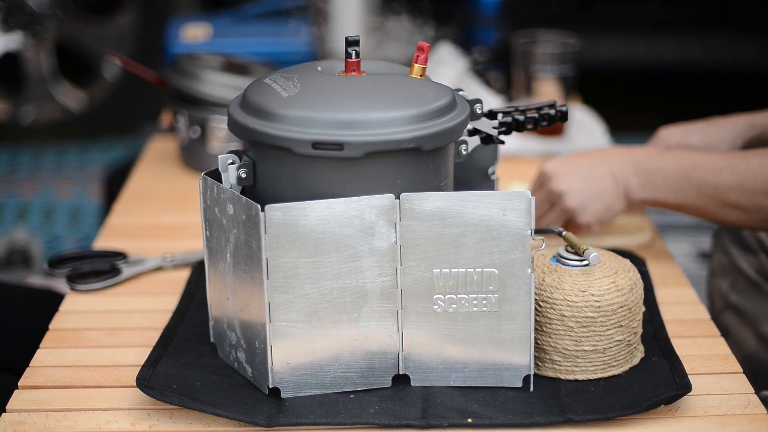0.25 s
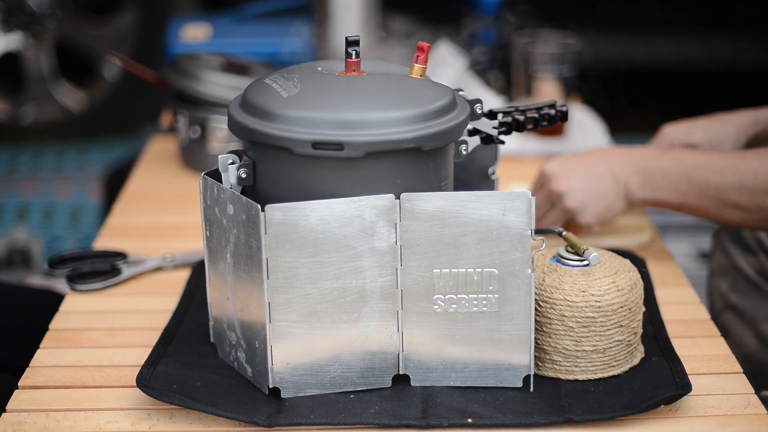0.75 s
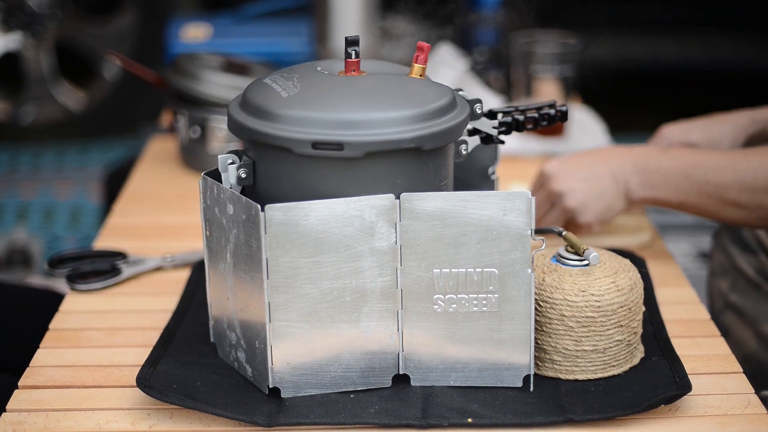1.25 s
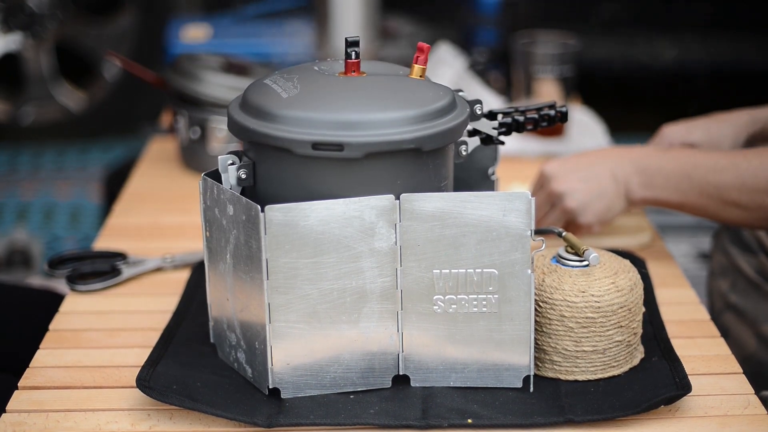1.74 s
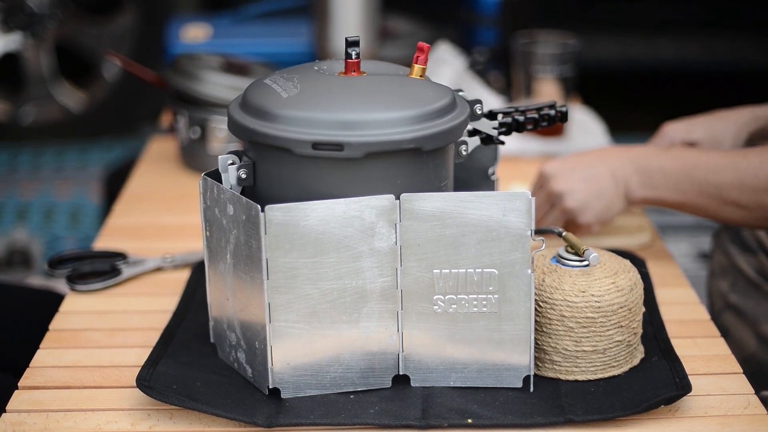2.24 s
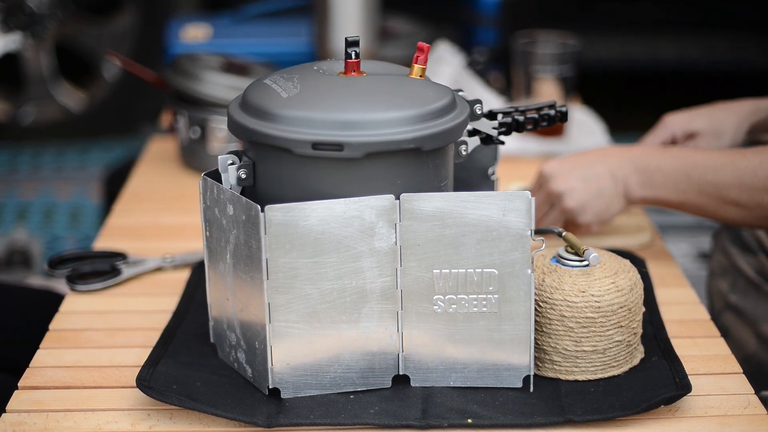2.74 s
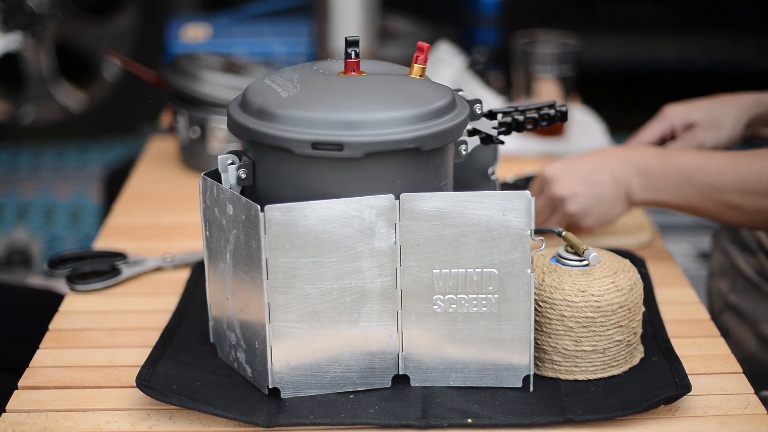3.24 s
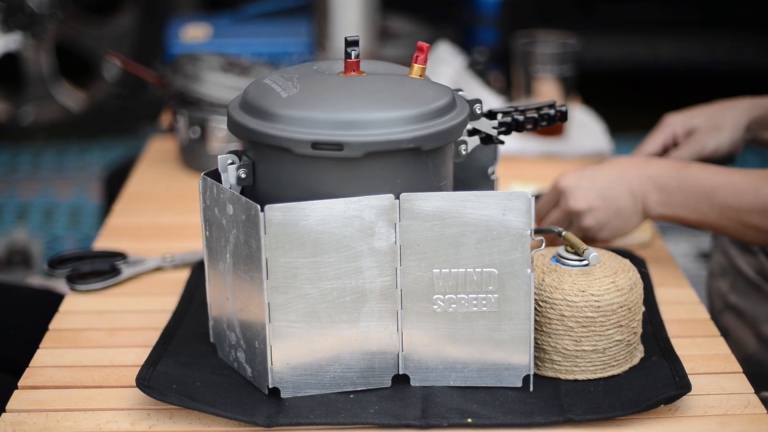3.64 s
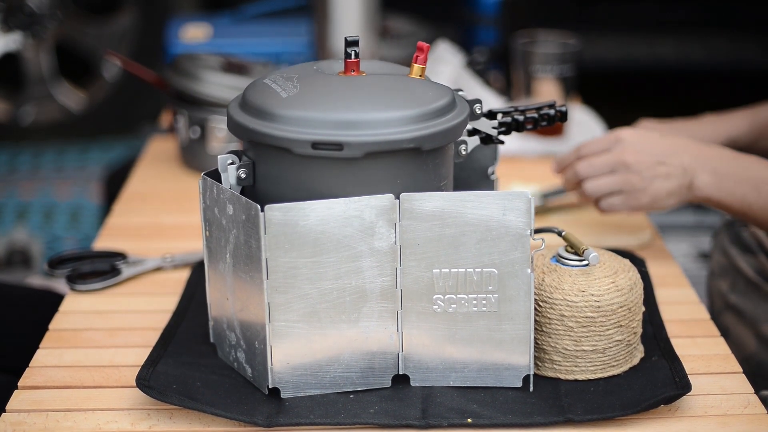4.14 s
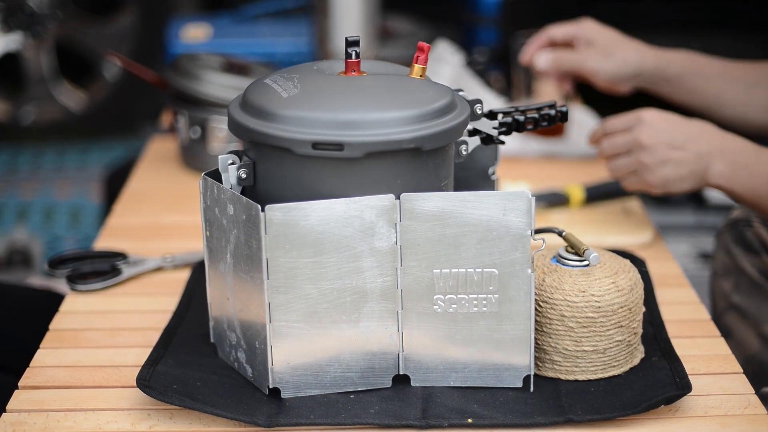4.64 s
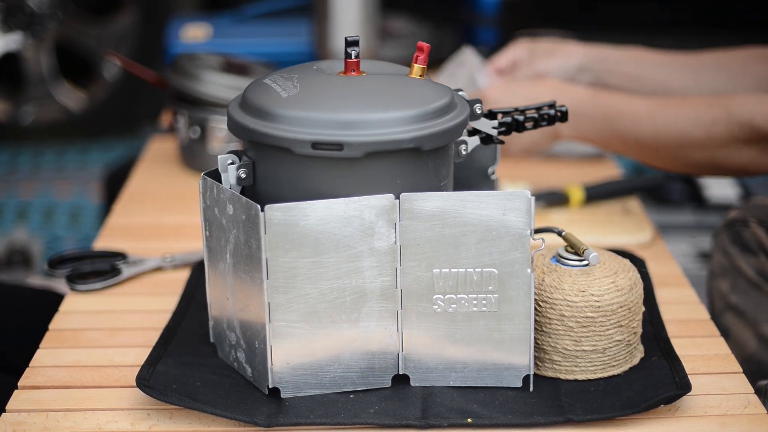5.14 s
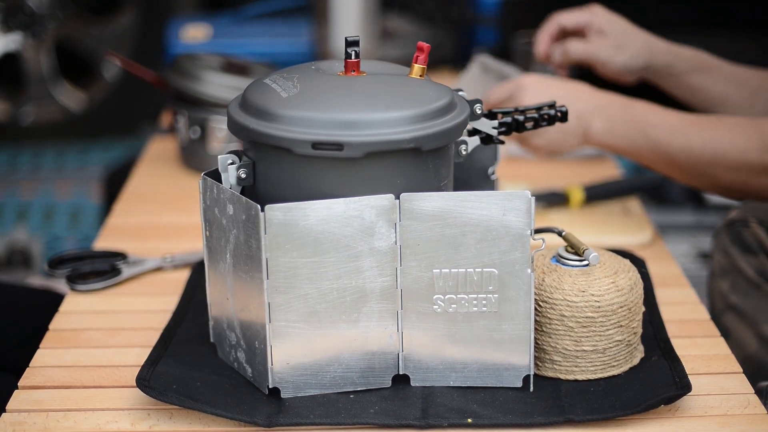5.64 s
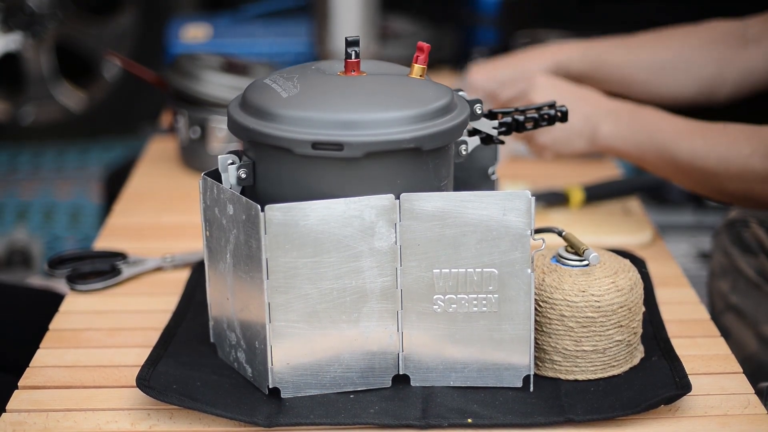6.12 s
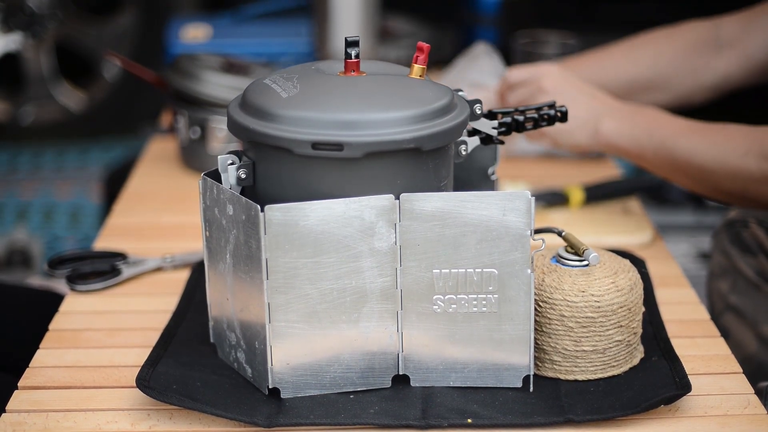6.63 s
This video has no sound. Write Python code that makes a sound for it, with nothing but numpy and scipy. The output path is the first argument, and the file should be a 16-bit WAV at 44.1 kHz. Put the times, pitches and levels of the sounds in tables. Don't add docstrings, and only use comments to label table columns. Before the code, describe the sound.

Steady thin steam hiss over a low burner roar, spaced knocks of a knife on wood, two sharp steam blasts, faint paper crinkle and wind.

```python
import sys
import numpy as np
from scipy import signal
from scipy.fft import rfft, irfft, next_fast_len
from scipy.io import wavfile
from scipy.ndimage import uniform_filter1d

SR = 44100
rng = np.random.default_rng(int(sys.argv[2]) if len(sys.argv) > 2 else 0)


def dump_mix(stems):
    frames = np.atleast_2d(stems).T
    limited = np.clip(frames, -1, 1)
    pcm = np.round(limited * 32767).astype(np.int16)
    wavfile.write(sys.argv[1], SR, pcm)


def gain_from_db(level_db):
    decades = np.asarray(level_db, float) / 20
    return 10 ** decades


N = 303408


def unit_rms(x):
    return x / np.sqrt(np.mean(x ** 2) + 1e-20)


def noise():
    return rng.standard_normal(N)


def spectrum(points, hz):
    f, value = np.transpose(points)
    return np.interp(np.log(hz + 1), np.log(f + 1), value)


def curves(rows, t):
    s, *columns = np.transpose(rows)
    return [np.interp(t, s, column) for column in columns]


def resonate(x, hz, width_hz):
    turn = np.exp(2j * np.pi * np.cumsum(hz * np.ones(len(x))) / SR)
    r = np.exp(-np.pi * width_hz / SR)
    return 2 * (turn * signal.lfilter([1 - r], [1, -r], x / turn)).real


def resonate_twice(x, hz, width_hz):
    return resonate(resonate(x, hz, width_hz), hz, width_hz)


def turbulence(colour, size, low_rows=None, base_db=0, from_hz=400, to_hz=4500,
               patchy_db=1.0, flicker_db=0.39):
    hop = size // 4
    frames, hz = N // hop + 5, np.fft.rfftfreq(size, 1 / SR)
    t = np.arange(frames) * hop / SR
    a, b, patches = rng.standard_normal((frames, len(hz), 3)).T
    patches = uniform_filter1d(patches, size=5, axis=0)
    patches = unit_rms(uniform_filter1d(patches, size=16, axis=1))
    flicker = unit_rms(uniform_filter1d(rng.standard_normal(frames), size=12))
    db = spectrum(colour, hz)[:, None] + patchy_db * patches + flicker_db * flicker
    if low_rows is not None:
        below = 1 / (1 + (hz[:, None] / to_hz) ** 4)
        above = 1 / (1 + (from_hz / (hz[:, None] + 1)) ** 4)
        db = db + (curves(low_rows, t)[1] - base_db) * below * above
    z = (a + 1j * b) * gain_from_db(db)
    return unit_rms(signal.istft(z, nperseg=size, noverlap=size - hop)[1][:N])


# t/s, level/dB, low hiss/dB
LEAK_CURVE = [(0, -42.5, -11), (.25, -42.5, -9), (.55, -41, -6), (.75, -42.5, -9), (.95, -42, -8.5),
              (1.4, -44.5, -10.5), (1.6, -47, -8), (2.3, -48.5, -8), (2.7, -45.5, -13.5),
              (3.2, -47.5, -12.5), (3.7, -45.5, -12), (4.5, -46, -14), (5.22, -44.5, -12.5),
              (5.4, -46.5, -4), (5.7, -47.5, -8), (6.35, -45.5, -7), (6.55, -46.5, -8.5), (6.88, -45, -9)]
# f/Hz, density/dB
LEAK_COLOUR = [(300, -30), (900, -18.5), (1500, -17), (2500, -6.5), (4000, -5), (6000, -0.66), (8500, -1),
               (9700, -5), (10700, -7), (11800, -10.5), (13000, -14), (15500, -19)]


def leak(t):
    jet = turbulence(LEAK_COLOUR, size=512, low_rows=LEAK_CURVE, base_db=-3.5, from_hz=1400, to_hz=4330)
    return gain_from_db(curves(LEAK_CURVE, t)[0] + 6.5) * jet


def lift(up_s, opening_s, down_s, db, linger_s):
    roar_open_db, roar_mid_db, roar_end_db, roar_after_db = -11.5, -5, -14, -3.5
    swell_db, drop_s, seat_s = 1, 0.006, 0.026
    mid_s = up_s + 0.33 * (down_s - up_s)
    return [(up_s, db - 30, roar_open_db),
            (up_s + opening_s, db - swell_db, roar_open_db),
            (mid_s, db - 0.8, roar_mid_db),
            (down_s, db + swell_db, roar_end_db),
            (down_s + drop_s, db - 10.5, roar_end_db),
            (down_s + seat_s, db - 24.5, roar_after_db),
            (down_s + seat_s + linger_s, db - 25, roar_after_db)]


# lift t/s, opening/s, drop t/s, level/dB, linger/s
BLOW_OFFS = [
    (1.398, 0.021, 1.5575, -28.5, 0.07),
    (5.236, 0.012, 5.349, -28, 0.092),
]
# f/Hz, density/dB
BLOW_COLOUR = [(200, -23.5), (400, -22), (700, -18), (1500, -8.5), (2500, -9), (4000, -5), (6000, -2),
               (8500, 0), (11000, -3.5), (13000, -11), (15500, -16)]


def blow_offs(t):
    blows = [lift(*row) for row in BLOW_OFFS]
    rows = sum(blows, [])
    lifted = sum((t > blow[0][0]) & (t < blow[-1][0]) for blow in blows)
    jet = turbulence(BLOW_COLOUR, size=256, low_rows=rows, base_db=-8, from_hz=150, to_hz=3460,
                     patchy_db=-1.5, flicker_db=1.2)
    return gain_from_db(curves(rows, t)[0] + 5.0) * jet * lifted


# t/s, f/Hz, level/dB
WHISTLE_CURVE = [(3.35, 4800, -55), (3.5, 4880, -47.5), (3.65, 5070, -53), (3.85, 5560, -49),
                 (4.1, 5460, -45.5), (4.45, 5470, -48), (4.75, 5830, -47), (5.12, 5730, -46.5),
                 (5.22, 5500, -70)]


def whistle(t):
    hz, db = curves(WHISTLE_CURVE, t)
    wobble = 1 + 0.029 * unit_rms(uniform_filter1d(noise(), size=900))
    tone = unit_rms(resonate_twice(noise(), hz * wobble, 520))
    sounding = (t > WHISTLE_CURVE[0][0]) * (t < WHISTLE_CURVE[-1][0])
    return gain_from_db(db) * tone * sounding


def steam(t):
    return leak(t) + blow_offs(t) + whistle(t)


# f/Hz, level/dB
PLUME_SHARE = [(600, -35), (2000, -5.5), (4000, -14.5), (8000, -35), (9500, -7.5), (10800, -11),
               (12000, -2.5), (13500, -20), (15500, -5)]


def plume(x):
    hz, t, z = signal.stft(x, SR, nperseg=128, noverlap=64, window="cosine")
    phases = np.exp(2j * np.pi * rng.random((len(t), len(hz), 2)).T)
    z = z * gain_from_db(spectrum(PLUME_SHARE, hz))[:, None] * phases
    return signal.istft(z, SR, nperseg=128, noverlap=64, window="cosine")[1][:, :N]


# f/Hz, density/dB
FLAME_COLOUR = [(88, -2), (150, -6), (293, -5.5), (404, 6), (439, 0.5), (477, 4.5), (592, -4.5), (716, 1.5),
                (1730, -29.5), (2600, -24), (3380, -56), (5720, -120)]
# t/s, level/dB
HUM_CURVE = [(0, -7), (1.2, -5.5), (1.5, -8.5), (2.2, -4.5), (3.5, -8.5), (4.1, 1.5), (4.7, -4.5), (6, -6),
             (6.4, -24)]


def burner(t):
    hum_hz, hum_width_hz = 476, 5.7
    flame = turbulence(FLAME_COLOUR, size=1024, patchy_db=2.5, flicker_db=0.35)
    hollow = gain_from_db(-4.5) * unit_rms(resonate(noise(), 434, 92))
    drift = uniform_filter1d(uniform_filter1d(noise(), size=6000), size=6000)
    drift_rad = 1.1 * unit_rms(drift)
    tone = np.sin(2 * np.pi * hum_hz * t + drift_rad)
    ringing = unit_rms(resonate(noise(), hum_hz, hum_width_hz))
    hum = gain_from_db(curves(HUM_CURVE, t)[0]) * unit_rms(tone + 0.29 * ringing)
    return gain_from_db(-58 + 2.0) * (flame + hollow + hum)


def strikes(events, modes, scatter_db=-9, scatter_t60_s=0.068, rise_s=0.00064, edge_db=2.0,
            later_s=0.0031):
    out, t = np.zeros(N + SR), np.arange(SR // 4) / SR
    hz, db, t60_s = np.transpose(modes)
    octaves = np.log2(hz / 1150)
    chances = rng.standard_normal((len(events), 3, len(modes)))
    for (s, peak_db, tilt_db, share), chance in zip(events, chances):
        level = gain_from_db(db + tilt_db * octaves + chance[0])
        turns = (hz * (1 + 0.004 * chance[1]))[:, None] * t + 0.04 * chance[2][:, None]
        rings = gain_from_db(-60 * t / t60_s[:, None]) * np.sin(2 * np.pi * turns)
        rings = rings * (1 - np.exp(-(t / rise_s) ** 2)) / np.linalg.norm(level)
        first = (level * gain_from_db(-edge_db * np.maximum(octaves, 0))) @ rings
        second = (level * gain_from_db(edge_db * np.minimum(octaves, 0))) @ rings
        hit = first + share * np.pad(second, (round(later_s * SR), 0))[:len(t)]
        burst = rng.standard_normal(len(t))
        scatter = unit_rms(sum(g * resonate_twice(burst, f, 490) for f, g in zip(hz, level)))
        scatter = scatter * np.minimum(t / 0.001, 1)
        hit = hit + gain_from_db(scatter_db - 60 * t / scatter_t60_s) * scatter
        out[round(s * SR):][:len(t)] += gain_from_db(peak_db - 2.0) * hit
    return signal.sosfilt(signal.butter(3, 210, "high", fs=SR, output="sos"), out[:N])


# t/s, peak/dB, tilt/(dB/octave), second contact share
CHOPS = [
    (0.288, -18.5, 0.5, 0.32),
    (0.528, -43, -4, 0.6),
    (0.817, -17, 1, 0.12),
    (1.256, -16, 1.5, 0.25),
    (1.749, -16, 2, 0.17),
    (2.29, -19.5, 1, 0.18),
    (2.908, -19, 0.5, 0.11),
    (3.581, -35.5, -4, 0.43),
]
# f/Hz, level/dB, t60/s
BOARD_MODES = [(260, -8, .03), (370, -8, .03), (520, -5, .04), (640, -11, .03), (840, -10, .025),
               (975, 0, .055), (1200, -9, .04), (1319, -1, .055), (1400, -10, .07), (1880, -6, .045),
               (2230, -7, .045), (2780, -12, .055), (2950, -13, .055), (3200, -14, .05), (3560, -12, .055),
               (4054, -10, .035), (4260, -10, .035)]


def chopping():
    return strikes(CHOPS, BOARD_MODES)


# t/s, peak/dB, tilt/(dB/octave), second contact share
KNIFE_CONTACTS = [
    (4.501, -19.5, 0, 0.36),
    (4.561, -40.5, 0, 0.98),
]
# f/Hz, level/dB, t60/s
KNIFE_MODES = [(300, -13, .05), (520, -10, .07), (850, -4, .075), (970, -9, .07), (1110, -6, .07),
               (1317, 0, .08), (1590, -3, .06), (1860, -7, .06), (2150, -5, .06), (2230, -4, .06),
               (2620, -6, .08), (3150, -9, .08), (3520, -8, .08), (3900, -11, .08), (4250, -7, .08),
               (4460, -8, .08), (4720, -9, .07), (5300, -8, .06), (5841, -10, .06)]


def knife_down():
    return strikes(KNIFE_CONTACTS, KNIFE_MODES, scatter_db=-4.5, scatter_t60_s=0.1, rise_s=0.00012,
                   edge_db=-1.0, later_s=0.0037)


# t/s, peak/dB, half length/s
RUSTLES = [
    (3.7, -65, 0.56),
    (5.293, -61, 0.49),
    (6.354, -61, 0.18),
]
# f/Hz, density/dB
PAPER_COLOUR = [(400, -19), (900, 4.5), (1400, 9), (2500, -15), (4000, 8.5), (7000, -40)]


def rustle(t):
    level = gain_from_db(-63) + sum(gain_from_db(db) * np.exp(-((t - s) / half_s) ** 2) for s, db, half_s in RUSTLES)
    return level * turbulence(PAPER_COLOUR, size=256, patchy_db=-1.5, flicker_db=2.0)


# collapse t/s, peak/dB, build-up/s, left re right/dB
GUST_EVENTS = [(.64, -55, .1, 0), (.9, -59, 0.28, 5), (1.18, -58, .15, 7), (1.42, -58, 0.13, 2),
               (1.59, -53.5, .2, 5), (1.85, -43, 0.18, 0.5), (1.99, -43.5, 0.22, 2),
               (2.14, -43.5, 0.11, 3.5), (2.33, -49.5, 0.13, 5), (2.46, -48, 0.15, 7), (2.7, -49, .4, 0),
               (2.86, -37.5, 0.11, 0), (2.94, -35, 0.066, 1), (3.04, -42, .2, 1.5), (3.21, -45.5, 0.19, 1),
               (3.31, -51.5, 0.17, 4), (3.74, -43.5, 0.062, 2), (3.98, -42, 0.27, 5.5),
               (4.22, -56, 0.26, 9), (4.42, -49.5, 0.29, 0), (4.76, -56.5, 0.96, 4.5),
               (5.17, -47.5, 0.19, 5), (5.45, -54.5, 0.41, 5), (5.61, -45, 0.075, 6),
               (5.9, -46.5, 0.53, 5.5), (6.24, -46, 0.45, 1), (6.34, -48.5, .15, -3),
               (6.6, -47.5, 0.46, 6.5), (6.72, -44, .2, -0.5), (6.9, -44, 0.094, 5)]


def gusts(t):
    calm_pan_db, build_db, collapse_db_per_s = 5, 17, 250
    end, db, build_s, pan_db = np.transpose(GUST_EVENTS)[:, :, None]
    before_db = build_db * ((end - t) / build_s) ** 2 * (t < end)
    after_db = collapse_db_per_s * (t - end)
    power = gain_from_db(db - np.maximum(before_db, after_db)) ** 2
    calm = gain_from_db(-62) ** 2
    total = power.sum(0) + calm
    return 10 * np.log10(total), ((power * pan_db).sum(0) + calm * calm_pan_db) / total


# f/Hz, density/dB
WIND_COLOUR = [(8.8, -45), (15, -25.5), (43, 1.5), (64, 1.5), (113, -2), (196, -12.5), (272, -20),
               (326, -15), (400, -25.5), (520, -24.5), (880, -120)]


def wind(t):
    coarse = t[::64]
    db, pan_db = (np.interp(t, coarse, curve) for curve in gusts(coarse))
    a, b = (turbulence(WIND_COLOUR, size=1024, patchy_db=0.94, flicker_db=1.44) for port in "LR")
    left, right = a * gain_from_db(pan_db / 2), (-0.6 * a + 1.16 * b) * gain_from_db(-pan_db / 2)
    push = gain_from_db(db + 3.5) * np.array([left, right])
    flutter = [unit_rms(resonate_twice(noise(), 150, 240)) for port in "LR"]
    return push + gain_from_db(-54.5 + 1.13 * (db + 42.0)) * flutter


# delay/ms, share
PORT_ECHOES = [
    [(0.348, -0.06), (0.457, 0.07), (0.693, -0.06), (0.832, 0.06), (1.079, 0.06), (1.185, -0.14), (1.567, -0.07)],
    [(0.106, -0.17), (0.315, -0.08), (0.428, -0.14), (0.511, 0.08), (0.609, -0.05), (0.799, -0.08), (0.964, 0.06), (1.074, -0.04), (1.138, 0.08)],
]
# f/Hz, phase/rad
PORT_PHASE = [(1000, 0), (2500, 0), (5000, 0.14), (7000, 0.24), (15000, 0.021)]


def ports(x):
    lag_ms = 0.046
    size = next_fast_len(N + 4096)
    hz = np.fft.rfftfreq(size, 1 / SR)
    combs = np.array([1 + sum(g * np.exp(-2j * np.pi * hz * ms / 1000) for ms, g in port)
                      for port in PORT_ECHOES])
    combs[1] *= np.exp(1j * (spectrum(PORT_PHASE, hz) - 2 * np.pi * hz * lag_ms / 1000))
    return irfft(rfft(x, size) * combs, size)[:, :N]


# f/Hz, t60/s
YARD_T60 = [(300, 0.62), (1500, 0.19), (5000, 0.23), (12000, 0.088)]
# f/Hz, level/dB
YARD_LEVEL = [(300, -11), (800, -4.5), (2000, -31), (5000, -9.5), (15000, -11)]


def yard(x):
    size = SR // 2
    taps = np.zeros((2, size))
    starts = np.arange(120, size - 20, 20)
    at = starts + rng.integers(0, 20, (2, len(starts)))
    np.put_along_axis(taps, at, rng.choice([-1., 1.], at.shape), 1)
    hz, t, z = signal.stft(taps / np.sqrt(len(starts)), SR, nperseg=256)
    decay = gain_from_db(-60 * t / spectrum(YARD_T60, hz)[:, None])
    decay = decay / np.sqrt((decay ** 2).mean(1, keepdims=True))
    decay = decay * gain_from_db(spectrum(YARD_LEVEL, hz))[:, None]
    response = signal.istft(z * decay, SR, nperseg=256)[1]
    return signal.fftconvolve(x[None], response, axes=1)[:, :N]


def scene():
    t = np.arange(N) / SR
    hiss, roar = steam(t), burner(t)
    hands = chopping() + knife_down() + rustle(t)
    flame = np.array([np.roll(roar, shift=9), roar]) * gain_from_db([[1.2], [-1.2]])
    scattered = yard(hiss + gain_from_db(0.5) * roar + gain_from_db(-6) * hands)
    return ports(hiss + hands) + plume(hiss) + flame + scattered + wind(t)


def top_cut(x):
    return signal.sosfilt(signal.butter(12, 16820, fs=SR, output="sos"), x)


def record(dry):
    lowpass = signal.firwin(511, 15650, window=("kaiser", 9), fs=SR)
    mix = signal.oaconvolve(dry, lowpass[None], "same")
    return top_cut(mix)


dry = scene()
out = record(dry)
dump_mix(out)
```